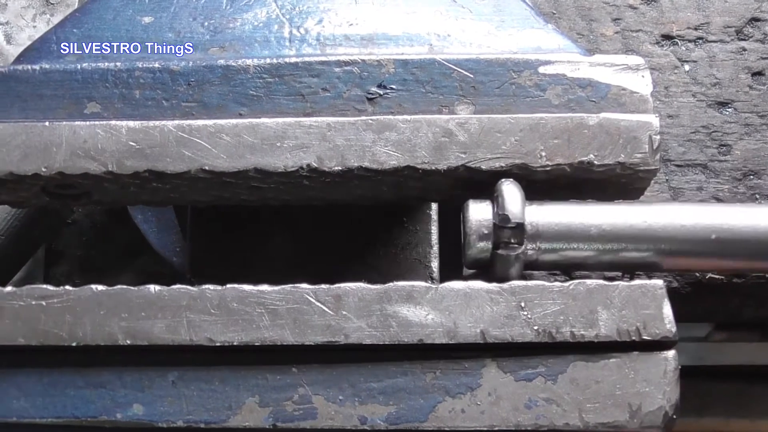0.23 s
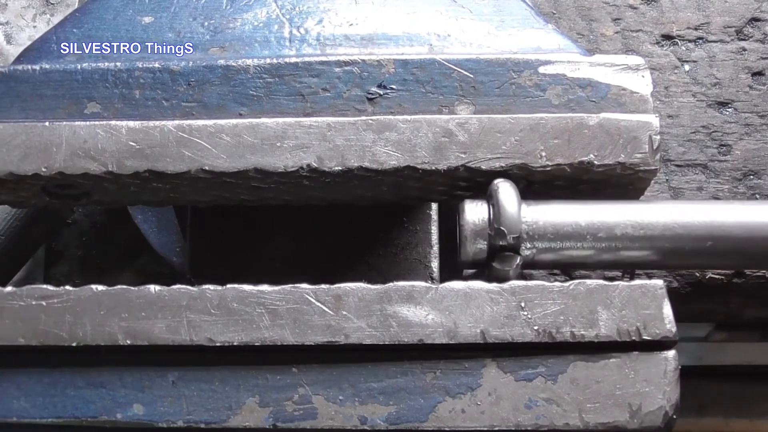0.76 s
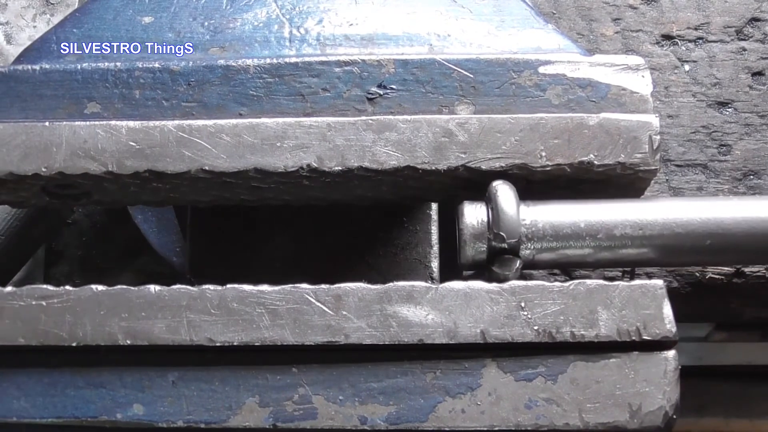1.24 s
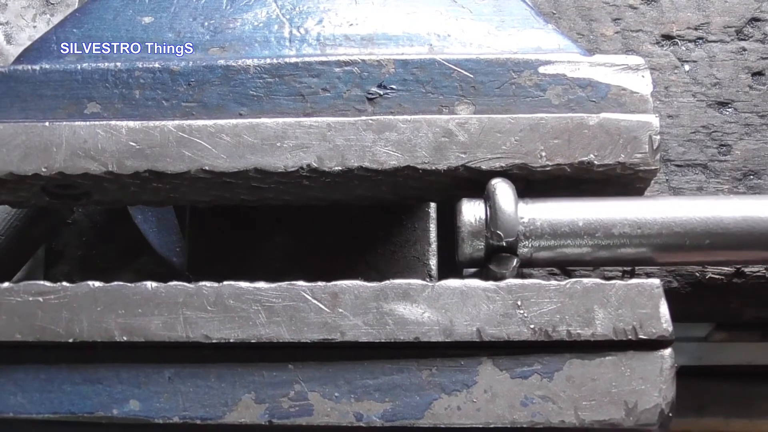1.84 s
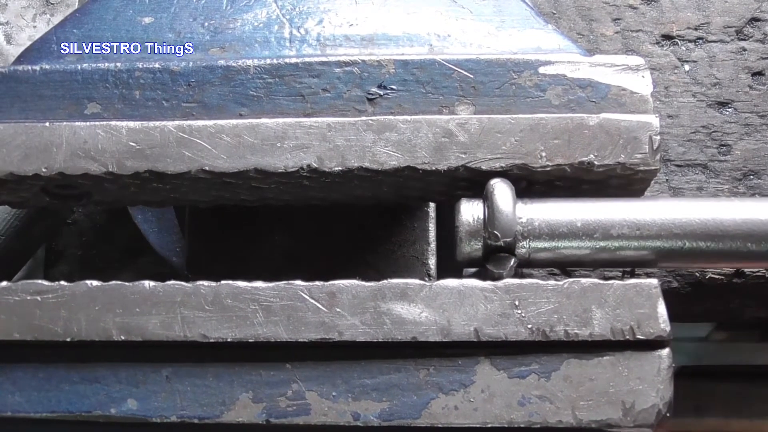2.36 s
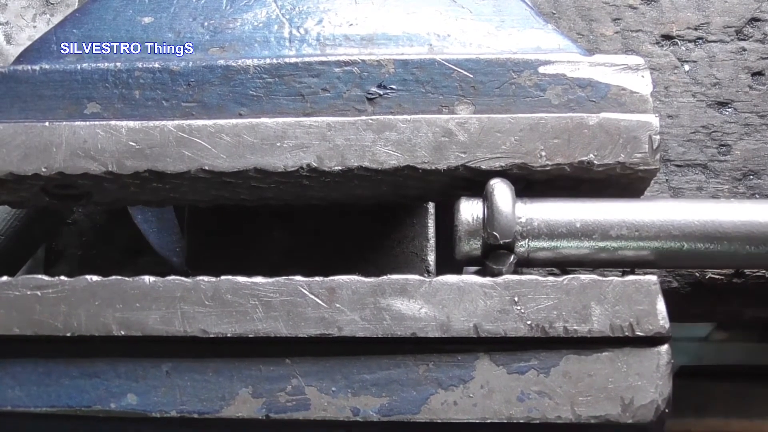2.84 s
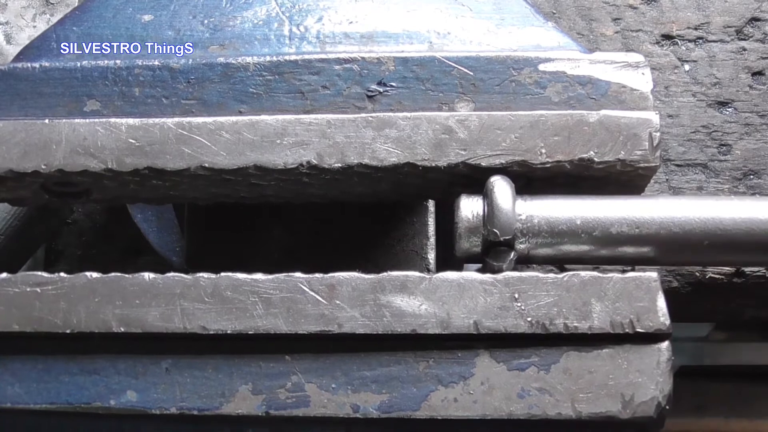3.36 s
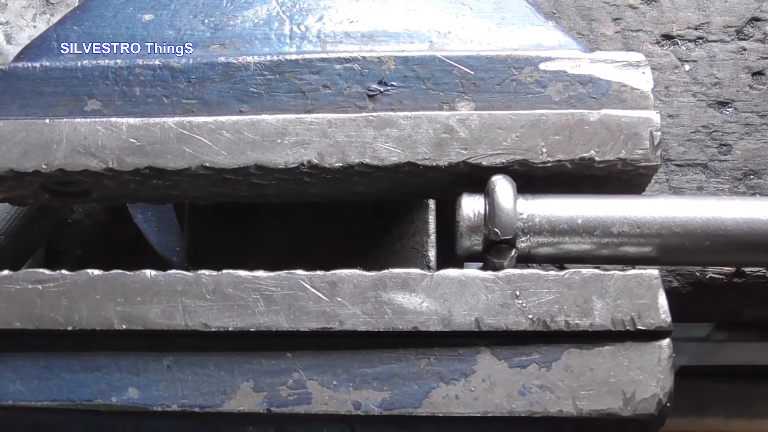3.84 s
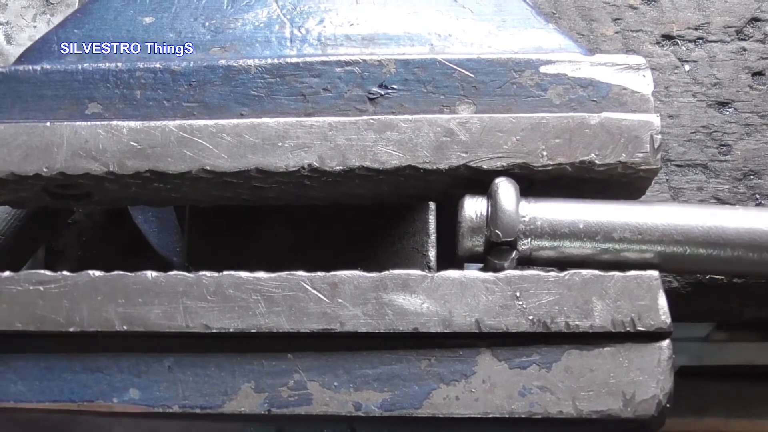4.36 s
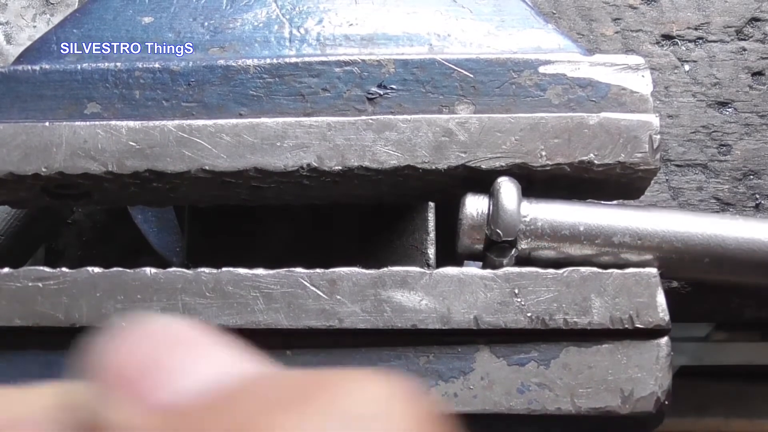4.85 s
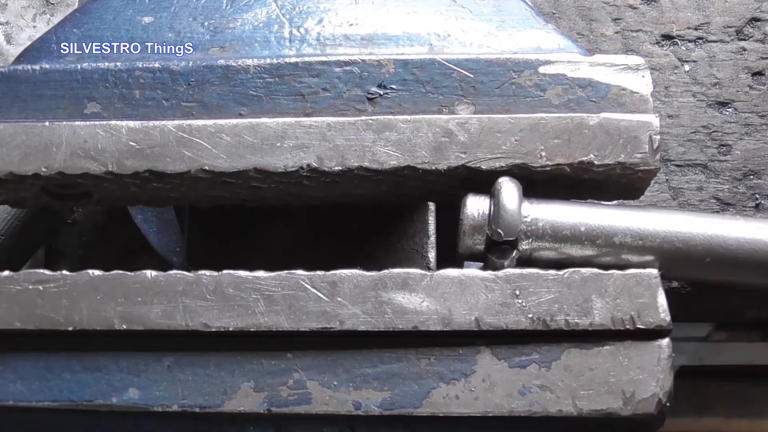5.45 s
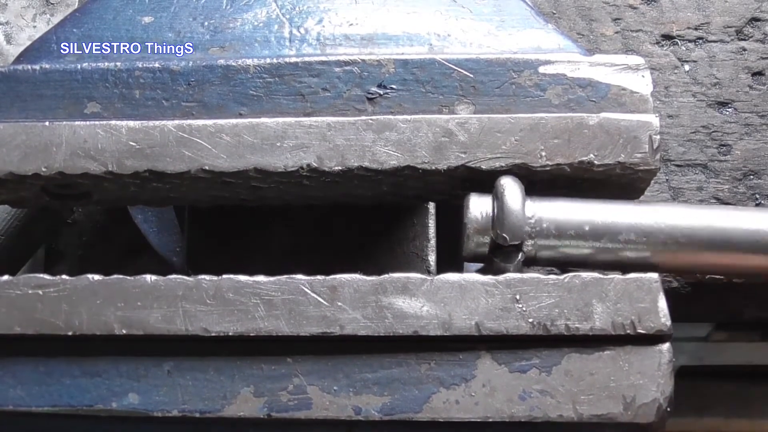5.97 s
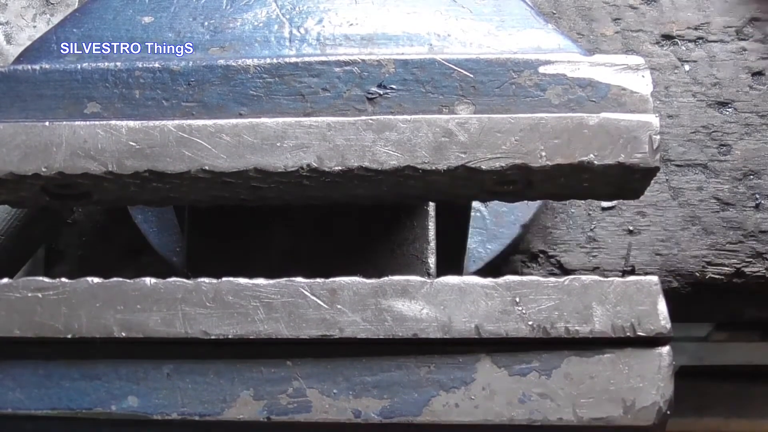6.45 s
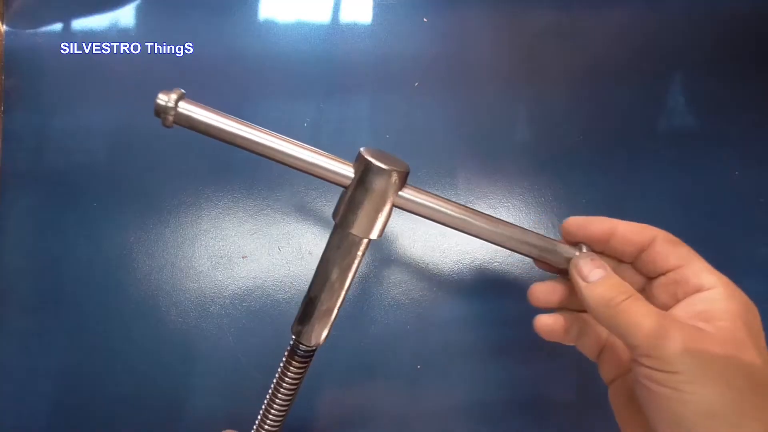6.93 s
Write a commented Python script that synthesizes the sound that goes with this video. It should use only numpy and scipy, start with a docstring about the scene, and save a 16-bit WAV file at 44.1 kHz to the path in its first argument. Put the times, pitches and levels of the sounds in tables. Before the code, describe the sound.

A loose steel handle scrapes against a heavy vise and lands with a cluster of sharp clacks and a bright clink at about 0.5 seconds, followed by a tiny squeak. It drags quietly over the jaws with a low rumble and a few soft knocks. From 2.4 to 3 seconds the screw turns with a hollow, grinding scrape. Sharp clacks and a brief rattle follow at 3.2 to 3.4 seconds, making the bench boom. Light ticks and rubbing lead to a dull double knock at 4.9. From 5.6 to 6.4 come louder knocks, hissing steel, a high clink near 6 and a clatter as the bar is drawn out. The sound cuts off at 6.5; one click breaks the silence, and around 6.9 the bar slides softly through the screw head. Everything is close, with slight room echo and a faint workshop hum.

```python
"""A loose steel bar, the handle of a vise, clinks in the vise screw as its end is pushed between the jaws.
Each hit knocks the heavy vise, clacks the screw head and rings the bar. In between, steel slides on
steel, the bench booms and the workshop hums faintly. After a short silence with one click in it, the
bar, now held in the hand, is slid softly through the screw head."""
import sys
import numpy as np
from scipy import signal
from scipy.fft import rfft, irfft, next_fast_len
from scipy.io import wavfile
from scipy.ndimage import map_coordinates

SR = 44100
rng = np.random.default_rng(int(sys.argv[2]) if len(sys.argv) > 2 else 0)


def store_pcm(level_fs):
    """Save levels as 16-bit WAV."""
    pcm = np.round(np.clip(level_fs, -1, 1) * 32767).astype(np.int16)
    wavfile.write(sys.argv[1], SR, np.atleast_2d(pcm).T)


N = 317520
TIME = np.arange(N) / SR
STEPS = np.arange(0, N, 64) / SR  # a coarser clock for loudness curves

# hits of the bar on the vise: (time [s], knock level [dB], knock pitch [Hz], knock spread [octaves],
# clack level [dB], clack pitch [Hz], ring level [dB])
HITS = [(0.322, -47, 695, 0.64, -73, 4200, -78), (0.433, -38.5, 1150, 1.1, -66, 2530, -62),
        (0.530, -34.5, 850, 1.2, -34.5, 5400, -35), (0.536, -27.5, 800, 1.3, -40.5, 4800, -28.5),
        (0.56, -26, 700, 1.12, -38, 2790, -40.5), (1.342, -38, 480, 1.7, -77, 4100, -88),
        (1.725, -45, 500, 0.57, -77, 5000, -80), (1.754, -38, 487, 0.54, -78, 5100, -62),
        (1.853, -43.5, 825, 0.74, -55.5, 4400, -67), (2.014, -46.5, 580, 1.6, -66, 4260, -65),
        (3.171, -30, 480, 1.1, -40.5, 3010, -61), (3.184, -25.5, 686, 0.72, -27.5, 3980, -40.5),
        (3.274, -39, 920, 0.56, -51, 3300, -65), (3.3395, -28, 1110, 0.67, -31.5, 4500, -42.5),
        (3.3591, -27.5, 700, 0.89, -25.5, 6320, -38), (3.955, -48.5, 520, 1.8, -68, 4000, -89),
        (4.377, -48, 490, 0.62, -74, 4420, -95), (4.661, -46.5, 696, 0.33, -67.5, 3780, -93.5),
        (4.892, -31.5, 655, 0.85, -65.5, 3670, -84), (4.914, -29, 620, 0.59, -67, 4800, -80),
        (5.6, -40, 700, 0.66, -58, 4030, -81), (5.638, -26.5, 790, 0.75, -65, 4330, -79.5),
        (5.788, -23.5, 860, 0.87, -33, 6450, -49.5), (5.945, -31.5, 1380, 0.88, -47, 3240, -64.5),
        (5.9641, -48.5, 300, 1.7, -40, 7270, -18.5), (6.196, -33.5, 580, 0.55, -55.5, 2990, -72),
        (6.211, -32.5, 607, 1.15, -54.5, 3480, -61.5), (6.262, -32, 724, 1.4, -53, 3900, -65),
        (6.284, -28, 700, 1.1, -40.5, 5890, -58), (6.305, -24, 950, 0.67, -35.5, 4970, -49),
        (6.312, -29.5, 1000, 0.97, -35, 3260, -53.5), (6.402, -27, 740, 1.04, -44, 3500, -65)]
# light ticks of grit, with no knock: (time [s], level [dB])
TICKS = [(2.996, -45.5), (3.0877, -43), (4.097, -49.5), (4.268, -57), (5.717, -55)]
# modes, the tones a part rings at; t60 is the time to fade by 60 dB: (pitch [Hz], level [dB], t60 [s])
BAR_MODES = [(3790, -23, .07), (7232, 0, .056), (11175, -5.5, .055), (11600, -5.5, .048)]
VISE_MODES = [(149, -12, 0.24), (215, -9, 0.044), (288, -15, 0.28), (365, 2, 0.034), (422.7, 0, 0.11),
              (560, 2.5, 0.018), (721.5, 0.5, 0.048), (779, -4, 0.059), (910, -7.5, 0.032),
              (993, -2.5, 0.033), (1198.5, -7.5, 0.046), (1395, -12.5, 0.061), (1504, -6.5, 0.041)]
SCREW_MODES = [(2003, 4.5, 0.028), (2230, 1.5, 0.061), (3120, 2.5, 0.025), (3400, 1.5, 0.03),
               (3726, -1, 0.075), (3990, -1, 0.089), (4210, -3.5, 0.029), (4450, -5, 0.024),
               (4690, -2, 0.031), (4900, -10, .04), (5750, -2.5, 0.022), (6800, 2, 0.012),
               (6800, -1, 0.022), (7480, 3.5, .02), (8160, 8.5, 0.015), (10070, -6.5, 0.023)]
# single tones that stand out of a hit: (time [s], pitch [Hz], level [dB], t60 [s])
NOTES = [(0.531, 3780, -31.5, 0.05), (0.532, 11900, -32, .03), (0.56, 413, -27, 0.065),
         (0.561, 7200, -33, 0.03), (1.854, 1220, -47.5, .06), (2.014, 1190, -51, .06),
         (3.182, 4330, -30.5, 0.038), (3.184, 7250, -35, 0.08), (3.185, 442, -29, 0.1),
         (3.277, 1160, -40, 0.067), (3.277, 3160, -46, .05), (3.342, 4700, -26.5, 0.028),
         (3.3593, 3190, -30, 0.021), (3.3595, 5550, -30, .02), (3.36, 11900, -31, 0.009),
         (3.362, 148, -34, .3), (3.4, 226, -39, .35), (4.383, 545, -42, 0.025), (4.916, 286, -31.5, .15),
         (5.6385, 757, -15, 0.05), (5.639, 360, -24.5, 0.056), (5.791, 395, -28.5, 0.08),
         (6.308, 1990, -31, 0.038), (6.309, 2920, -29.5, 0.03), (6.309, 5700, -36.5, 0.03),
         (6.31, 406, -22, .08)]
# rattles after hard hits and as the bar is drawn out; swell is the level change from start to end:
# (start [s], length [s], swell [dB], clack level [dB], ring level [dB])
RATTLES = [(0.576, 0.087, -9, -54.5, -58), (3.206, 0.054, -7.5, -51, -65), (3.377, 0.16, -5, -52.5, -69.5),
           (6.368, .12, 3, -65.5, -55)]
# pushes of the bar over the jaws:
# (start [s], length [s], swell [dB], rumble level [dB], rumble pitch [Hz], grind [dB], hiss [dB])
PUSHES = [(0.295, 0.24, 12, -43.5, 667, -60, -60.5), (0.546, 0.3, -8.5, -51, 462, -86, -66),
          (1.062, 0.21, 10, -56, 570, -67, -62), (1.261, 0.43, 5.5, -47, 445, -75, -68),
          (1.682, 0.2, 6.5, -49, 450, -66, -60), (2.017, 0.27, 10, -49.5, 512, -58.5, -53.5),
          (2.289, 0.14, 3.5, -47, 600, -63.5, -68), (2.419, 0.38, -3, -43, 633, -52, -55),
          (2.814, .16, 2.5, -38.5, 634, -48, -57), (2.99, 0.17, -6.5, -55.5, 546, -67, -54.5),
          (3.2, 0.14, 7, -47, 558, -74, -59.5), (3.36, 0.39, -12, -55, 456, -70.5, -64),
          (3.924, 0.27, 5.5, -54, 548, -70.5, -71), (4.56, 0.16, 2.5, -52.5, 511, -72, -87),
          (4.93, 0.35, -6.5, -50, 492, -67.5, -63), (5.193, 0.34, 2, -43.5, 470, -58, -52.5),
          (5.555, 0.36, 7.5, -50.5, 653, -61, -54.5), (5.97, 0.35, 14.5, -44.5, 500, -60, -56.5),
          (6.198, 0.25, 14, -38.5, 620, -50, -61)]
# the bar's edge catches, and the screw turns: (start [s], length [s], swell [dB], level [dB])
CATCHES = [(0.35, 0.17, 22, -57), (0.526, 0.0096, 3, -22.5), (0.546, 0.12, -18, -61),
           (1.57, 0.054, -9, -54.5), (5.962, 0.21, -13.5, -55), (6.341, 0.14, 11.5, -44.5)]
TURNS = [(2.389, .41, 5, -42.5), (2.831, 0.15, 4.5, -39.5)]
# heavy hits that shake the bench: (time [s], level [dB])
SHAKES = [(1.754, -48), (2.017, -48), (3.184, -42), (3.367, -38.5), (4.92, -43), (5.645, -39), (5.8, -42.5),
          (6.289, -39.5)]
# resonances, the pitches that a part boosts: (pitch [Hz], width [Hz], level [dB])
NUT_PEAKS = [(700, 320, 0)]
HELD_BAR_PEAKS = [(642, 43, 0.5), (1252, 23, -3.5), (1890, 42, -2.5), (2550, 37, -5.5), (3230, 54, -7),
                  (5850, 140, -6.5), (9100, 92, -6.5), (10500, 60, -15.5), (12500, 220, -22)]
BENCH_PEAKS = [(116, 10, -11), (151.4, 8.8, 0.5), (213, 43, -0.5), (312, 34, -6)]
# tone colours of the noises: (frequency [Hz], level [dB])
THUD_COLOUR = [(40, -21.5), (110, -34.5), (300, -1), (700, -5.5), (1350, -6), (1800, -13), (3500, -28.5),
               (8000, -73)]
CRACK_COLOUR = [(600, -24.5), (1700, 1), (3500, 0), (8000, -7.5), (10000, -10.5), (12000, -8.5),
                (14000, -20), (16000, -26.5)]
RUMBLE_COLOUR = [(40, -34.5), (100, -24), (200, -5.5), (450, -3), (730, -4.5), (1000, -5.5), (1400, -1),
                 (1800, -14), (3500, -29)]
GRIND_COLOUR = [(700, -22), (1500, -2.5), (2300, 5), (3300, 0.5), (4600, 0), (6000, -9.5), (10000, -31)]
HISS_COLOUR = [(2000, -32), (4000, -3), (6000, -7), (7600, -1.5), (10000, -7), (12500, -10.5),
               (14500, -19.5), (16000, -37.5)]
AIR_COLOUR = [(15, -63.5), (25, -8.5), (105, -13), (206, -11.5), (249, -6), (317, -13), (863, -16),
              (2690, -34.5), (9000, -30), (13000, -32), (16000, -38)]
HUSH_COLOUR = [(25, -26), (153, -29), (354, -5), (607, -11), (714, -20), (4610, -22), (16000, -33)]
# faint tones of the workshop's hum: (pitch [Hz], level [dB])
HUM_TONES = [(80.7, -75), (107.7, -76), (199.2, -74.5)]
# rise and fall of its strongest tone: (time [s], level [dB])
DRONE_LEVELS = [(0, -85.5), (3, -71), (3.9, -65), (4.55, -62.5), (4.9, -81), (6.5, -84.5)]
# how long the room echoes: (frequency [Hz], time to fade by 68 dB [s])
ECHO_TIMES = [(150, 1), (500, 1), (1500, 0.93), (4000, 0.93), (8000, 0.68), (14000, 0.21)]
# stereo width: (frequency [Hz], side minus middle [dB])
WIDTH = [(50, -5.5), (200, -11.5), (700, -8), (3000, -5), (8000, -2), (14000, -0.5)]
# where the bar's ring and the whole hits are heard: (frequency [Hz], left minus right [dB])
RING_PAN = [(7200, 1), (11200, -2.5)]
HIT_PAN = [(400, -0.5), (1200, 2.5), (3500, 0.8)]
# where the rubbing is heard: (time [s], left minus right [dB])
RUB_PAN = [(0, -3.5), (1.9, -1.5), (2.8, -6), (3.3, -3), (5.3, -2), (6.3, -1)]

REBOUND_S, REBOUND_DB, REBOUND_DULL_DB = 0.0045, -2.5, -5.5  # a bounce loses more clack than knock
ATTACK_S, RELEASE_T60 = 0.056, 0.46  # how a push takes hold and lets go
REST_DB, REST_HZ = -63, 403  # faint rumble of the bar resting on the jaws
PAUSE_START_S, PAUSE_END_S = 6.499, 6.737
SIDES = np.array([[0.5], [-0.5]])  # half to the left, the opposite half to the right


def bar_hits():
    """Each hit sounds the vise, screw head and bar, then bounces once; ticks leave the vise still."""
    out, t = np.zeros((2, N)), np.arange(SR // 3) / SR
    for start, db in TICKS:
        tick = (clack(t, centre_hz=7500) + amp(-1) * clink(t)) * fade(t, t60=0.0091)
        add(out, start, amp(db) * unit_hit(tick))
    for start, knock_db, knock_hz, octaves, clack_db, clack_hz, ring_db in HITS:
        def strike(db):
            return amp(knock_db) * knock(t, knock_hz, octaves) + amp(db + 2.5) * clack(t, clack_hz)
        add(out, start, strike(clack_db) + amp(ring_db) * clink(t))
        add(out, start + REBOUND_S, amp(REBOUND_DB) * strike(clack_db + REBOUND_DULL_DB))
    return out


def clink(t):
    """The struck bar snaps and rings in its high modes, the highest louder on the right."""
    tones = unit_hit(ring(BAR_MODES, t, np.ones_like, scatter_db=1, detune=0.0008))
    bright = colour([(2500, -29), (7000, 3), (10000, 0.5), (15000, -26)])
    snap = noise(bright, len(t)) * fade(t, t60=0.0071)
    return panned(tones + amp(-5) * unit_hit(snap), RING_PAN, left_lag_s=0.00001)


def knock(t, centre_hz, octaves):
    """The heavy vise takes a moment to swing; the bench adds a dull thud."""
    weight = lambda hz: np.exp(-0.5 * (np.log2((hz + 1) / centre_hz) / octaves) ** 2)
    tones = ring(VISE_MODES, t, weight, scatter_db=2, detune=0.006)
    thud = noise(lambda hz: colour(THUD_COLOUR)(hz) * weight(hz), len(t)) * fade(t, t60=0.11)
    rise = 1 - np.exp(-t * octaves ** 2 / 0.0019)  # a softer hit has less spread and starts more slowly
    return unit_hit((unit_hit(tones) + amp(-3) * unit_hit(thud)) * rise)


def clack(t, centre_hz):
    """Steel chatters briefly on steel and rings the screw head."""
    weight = lambda hz: around(hz, centre_hz, octaves=0.93)
    tones = ring(SCREW_MODES, t, weight, scatter_db=2.5, detune=0.008)
    crack = noise(lambda hz: colour(CRACK_COLOUR)(hz) * weight(hz), len(t)) * fade(t, t60=0.056)
    rise = 1 - np.exp(-t / 0.0002)
    return unit_hit((unit_hit(tones) + amp(3) * unit_hit(crack)) * rise)


def notes():
    """Depending on where a hit lands, single tones stand out, roughened by the chatter."""
    out, t = np.zeros((2, N)), np.arange(SR // 3) / SR
    rise = 1 - np.exp(-t / 0.0019)
    for start, hz, db, t60 in NOTES:
        chatter = noise(lambda f: resonances([(hz, mode_width(t60), 0)], f) ** 2, len(t))
        tone = np.sin(2 * np.pi * hz * t) + 0.42 * chatter
        add(out, start, amp(db) * unit_hit(tone * fade(t, t60) * rise))
    return out + amp(-13) * room_echo(out)  # close by, so little echo


def rattles(count=12):
    """The loose bar chatters in small, uneven clacks, each ringing it a little."""
    out, t = np.zeros((2, N)), np.arange(SR // 15) / SR
    for start, length, swell_db, clack_db, ring_db in RATTLES:
        for k in range(count):
            progress = (k + rng.random()) / count
            gain = amp(swell_db * (progress - 0.5) - 1.5 * rng.uniform(-1.3, 1))
            hit = amp(clack_db) * clack(t, centre_hz=3700) + amp(ring_db) * clink(t)
            add(out, start + progress * length, gain * hit)
    return out


def pushes():
    """Add up the pushes into four curves: rumble gain, rumble pitch, grind gain and hiss gain."""
    power = np.array([gesture(*row[:3], RELEASE_T60) for row in PUSHES]) ** 2
    rumble_db, pitch_hz, grind_db, hiss_db = np.transpose(PUSHES)[3:]
    rumble, grind, hiss = (amp(db) ** 2 @ power for db in (rumble_db, grind_db, hiss_db))
    rest = amp(REST_DB) ** 2
    mean_hz = ((pitch_hz * amp(rumble_db) ** 2) @ power + REST_HZ * rest) / (rumble + rest)
    return np.sqrt(rumble + rest), mean_hz, np.sqrt(grind), np.sqrt(hiss)


def dragging(gain, centre_hz):
    """The bar's end drags over the jaws: the vise rumbles, its pitch changing from push to push."""
    rumble = rubbed(VISE_MODES, RUMBLE_COLOUR, modes_db=-10.5, rough_db=0.5)
    hz, t, spectrum = signal.stft(rumble, SR, nperseg=1024)
    centre = np.interp(t, STEPS, centre_hz)
    focus = around(hz[:, None], centre, octaves=1) + around(hz[:, None], centre, octaves=0.36)
    return smooth(gain) * unit(signal.istft(spectrum * focus, SR, nperseg=1024)[1][:, :N])


def sliding(grind, hiss):
    """Steel slides on steel: a grind in the screw and a fine hiss at the surface."""
    return (smooth(grind) * rubbed(SCREW_MODES, GRIND_COLOUR, modes_db=-1, rough_db=1)
            + smooth(hiss) * rubbed(SCREW_MODES, HISS_COLOUR, modes_db=-22, rough_db=1.05))


def rubbed(modes, spectrum, modes_db, rough_db):
    """Rubbing is many tiny, uneven slips: a noise in which the part's own tones stand out."""
    peaks = [(hz, mode_width(t60), db + modes_db) for hz, db, t60 in modes]
    slips = amp(rough_db * wobble(170) + wobble(20))
    return unit(slips * noise(lambda hz: colour(spectrum)(hz) * (1 + resonances(peaks, hz))))


def turning():
    """The screw turns in its nut with a hollow scrape."""
    return gestures(TURNS, RELEASE_T60) * noise(lambda hz: resonances(NUT_PEAKS, hz) ** 2)


def singing():
    """Where its edge catches, the rubbed bar sings in its high modes."""
    shapes = [(169, -2.5), (90, 4.5), (70, -2.5), (110, 0.5)]  # (width [Hz], level [dB])
    peaks = [(mode[0], width, db) for mode, (width, db) in zip(BAR_MODES, shapes)]
    tone = noise(lambda hz: resonances(peaks, hz) ** 1.7)  # the power sharpens the peaks
    return gestures(CATCHES, release_t60=0.024) * tone


def squeak():
    """One short catch makes the screw head chirp and the vise groan."""
    peaks = [(900, 700, 0.5), (2820, 84, 2.5), (3340, 180, -10)]
    tone = noise(lambda hz: resonances(peaks, hz) ** 1.7)
    return swell([(0.812, -72), (0.842, -38.5), (0.868, -61)]) * tone


def hand_held_bar(start=6.83, length=0.155, swell_db=6.5, slips_per_s=50, ring_hz=3252):
    """After a click, the held bar slips through the screw head in small jerks; one tone rings on."""
    bursts = [(6.693, -38, 0.03)]  # a short click in the silence: (time [s], level [dB], t60 [s])
    for k in range(int(length * slips_per_s) + 1):
        jitter, scatter = rng.standard_normal(2)
        offset = (k + 0.15 * jitter) / slips_per_s
        bursts.append((start + offset, -48 + swell_db * (offset / length - 0.5) + 2.5 * scatter, 0.11))
    gain = 0
    for time, db, t60 in bursts:
        t = np.maximum(STEPS - time, 0)
        gain += amp(db) * fade(t, t60) * (1 - np.exp(-t / 0.00094))
    scrape = smooth(gain) * noise(lambda hz: resonances(HELD_BAR_PEAKS, hz) ** 1.02)
    ring_gain = amp(-60) * smooth(gesture(start, length, swell_db, release_t60=0.31))
    return scrape + ring_gain * np.sin(2 * np.pi * ring_hz * TIME)


def bench(rumble):
    """The bench booms under the dragging and after heavy hits."""
    steady = amp(-44) * rumble ** 0.32  # follows the rumble, but swings less
    shaken = [amp(db) * (STEPS > start) * fade(np.abs(STEPS - start), t60=0.58) for start, db in SHAKES]
    bass = colour([(50, -8), (120, 0), (300, 0), (700, -25)])
    boom = noise(lambda hz: resonances(BENCH_PEAKS, hz) * bass(hz))
    return smooth(np.linalg.norm([steady] + shaken, axis=0)) * boom


def room_echo(x, build_s=0.0053):
    """The workshop's echo builds quickly, and its highs die away first."""
    hz, t, spectrum = signal.stft(rng.standard_normal((2, SR)), SR, nperseg=256)
    decay = 0.00039 ** (t / along(ECHO_TIMES, hz)[:, None])
    tail = signal.istft(spectrum * decay, SR, nperseg=256)[1]
    age = np.arange(tail.shape[1]) / SR
    tail = stereo(tail * (1 - np.exp(-(age / build_s) ** 2)))
    warm = colour([(150, 8), (600, -2.5), (4000, -7.5), (7500, -10.5), (12000, -17.5)])
    tail = filtered(tail / np.linalg.norm(tail[0]), warm)
    return signal.fftconvolve(x.mean(0)[None], tail, axes=1)[:, :N]


def hum(drone_hz=160, waver_db=3):
    """The workshop hums in faint, wavering tones; one swells for a while."""
    tone = lambda hz: np.sqrt(2) * np.sin(2 * np.pi * hz * TIME + 0.5 * wobble(4.1))
    drone = swell(DRONE_LEVELS) * tone(drone_hz)
    return drone + sum(amp(db + waver_db * wobble(1.6)) * tone(hz) for hz, db in HUM_TONES)


def hush():
    """A soft noise behind the held bar, sinking as the slide ends."""
    return amp(np.interp(TIME, [6.96, 7.04], [-57, -68])) * noise(colour(HUSH_COLOUR))


def ring(modes, t, weight, scatter_db, detune):
    """Fading tones; the spot that is hit changes their strength and, a little, their pitch."""
    hz, db, t60 = np.transpose(modes)
    loudness, sign, tuning, shift = rng.standard_normal((4, len(hz)))
    gain = amp(db + scatter_db * loudness) * weight(hz) * np.sign(sign)
    decay = gain[:, None] * fade(t, t60[:, None])
    phase = 2 * np.pi * (hz * (1 + detune * tuning))[:, None] * t
    skew = 0.14 * shift[:, None]  # left and right are slightly out of step
    return np.array([(decay * np.sin(phase + side)).sum(0) for side in (skew, -skew)])


def gesture(start, length, swell_db, release_t60):
    """Gain of one push: it rises, swells or sags while held, then fades."""
    t = STEPS - start
    rise = np.clip(t / min(ATTACK_S, length / 2), 0, 1)
    hold = amp(swell_db * (np.clip(t / length, 0, 1) - 0.5))
    return rise * hold * fade(np.maximum(t - length, 0), release_t60)


def gestures(rows, release_t60):
    """Gain of several pushes added together, at every sample."""
    return smooth(sum(amp(db) * gesture(*shape, release_t60) for *shape, db in rows))


def swell(points):
    """Turn (time [s], level [dB]) points into gain, silent outside them."""
    return amp(np.interp(TIME, *np.transpose(points), left=-120, right=-120))


def fade(t, t60):
    """Fall by 60 dB every t60 seconds."""
    return amp(-60 * t / t60)


def smooth(steps):
    """Fill in a coarse curve at every sample."""
    return np.interp(TIME, STEPS, steps)


def wobble(rate):
    """A smooth random curve with rate new values a second."""
    return map_coordinates(rng.standard_normal(int(N * rate / SR) + 4), [TIME * rate])


def noise(response, size=N):
    """Stereo noise with the given tone colour and an average (rms) level of 1."""
    return unit(stereo(filtered(rng.standard_normal((2, size)), response)))


def stereo(pair):
    """Mix two unrelated signals: nearly mono in the bass, wider in the treble."""
    side = filtered(pair[1], colour(WIDTH))
    return np.array([pair[0] + side, pair[0] - side])


def panned(x, pan, left_lag_s=0):
    """Send each frequency to its own side; the left may arrive later."""
    return filtered(x, lambda hz: amp(SIDES * along(pan, hz))
                    * np.exp(-2j * np.pi * hz * SIDES * left_lag_s))


def filtered(x, response):
    """Multiply each frequency in x by response(hz)."""
    n = x.shape[-1]
    padded = next_fast_len(n + 4096)
    return irfft(rfft(x, padded) * response(np.fft.rfftfreq(padded, 1 / SR)), padded)[..., :n]


def resonances(peaks, hz):
    """Gain of (pitch [Hz], width [Hz], level [dB]) peaks."""
    return np.sqrt(sum(amp(db) ** 2 / (1 + (2 * (hz - pitch) / width) ** 2) for pitch, width, db in peaks))


def mode_width(t60):
    """Width of a mode in Hz: the longer it rings, the narrower it is."""
    return np.log(1000) / np.pi / t60


def around(hz, centre_hz, octaves):
    """A contact stirs one range of pitches most, set by its hardness and place."""
    return 1 / (1 + (np.log2((hz + 1) / centre_hz) / octaves) ** 2)


def colour(points):
    """Turn (frequency [Hz], level [dB]) points into a filter curve."""
    return lambda hz: amp(along(points, hz))


def along(points, hz):
    """Read between (frequency [Hz], value) points, with octaves evenly spaced."""
    known_hz, values = np.transpose(points)
    return np.interp(np.log(hz + 1), np.log(known_hz + 1), values)


def amp(db):
    """Decibels to gain."""
    return 10 ** (np.asarray(db) / 20)


def unit(x):
    """Scale to an average (rms) level of 1."""
    return x / np.sqrt(np.mean(x ** 2) + 1e-20)


def unit_hit(x):
    """Scale a hit to the energy of 10 ms of sound at level 1."""
    return x / np.sqrt(np.sum(x ** 2) / 2 / (SR / 100) + 1e-20)


def add(out, start, sound):
    """Mix a sound into out at start seconds."""
    out[:, round(start * SR):][:, :sound.shape[1]] += sound


def scene():
    """Work at the vise, a short silence, then the bar in the hand."""
    hits = bar_hits()
    air = amp(-60.5) * noise(colour(AIR_COLOUR))
    rumble, centre_hz, grind, hiss = pushes()
    rubbing = dragging(rumble, centre_hz) + turning() + sliding(grind, hiss) + singing() + squeak()
    rubbing *= amp(SIDES * np.interp(TIME, *np.transpose(RUB_PAN)))
    clatter = panned(hits + amp(-8.5) * room_echo(hits) + notes() + rattles(), HIT_PAN)
    at_vise = clatter + rubbing + bench(rumble) + hum() + air
    before_pause = np.clip((PAUSE_START_S - TIME) / 0.002, 0, 1)
    return at_vise * before_pause + hand_held_bar() + (hush() + air) * (TIME > PAUSE_END_S)


def record(dry, ceiling=0.56, low_hz=33, top_hz=15850):
    """Round off the loudest peaks, then cut the deepest bass and the highest treble."""
    rounded = dry / (1 + (dry / ceiling) ** 6) ** (1 / 6)
    return filtered(rounded, lambda hz: hz ** 2 / np.hypot(hz ** 2, low_hz ** 2)
                    / (1 + (hz / top_hz) ** 120))


dry = scene()
out = record(dry)
store_pcm(out)
```